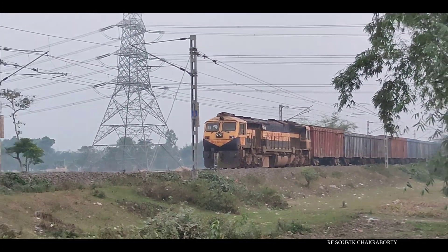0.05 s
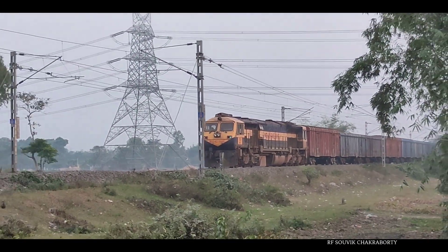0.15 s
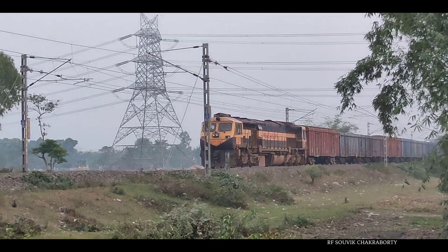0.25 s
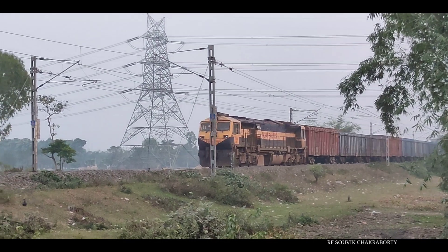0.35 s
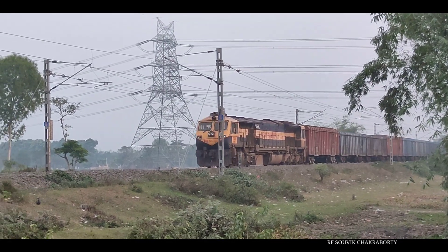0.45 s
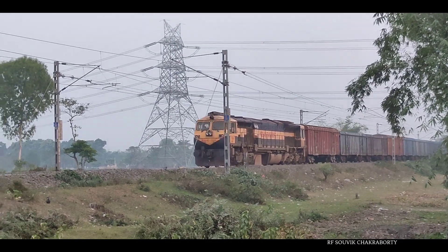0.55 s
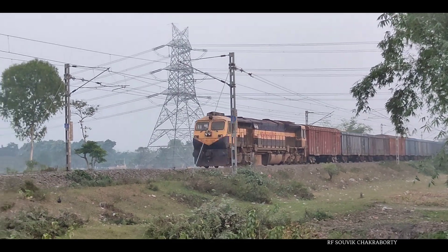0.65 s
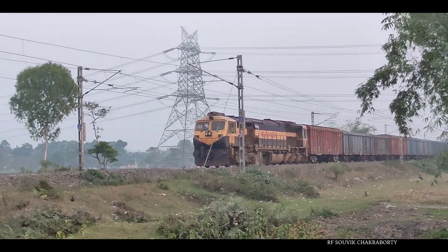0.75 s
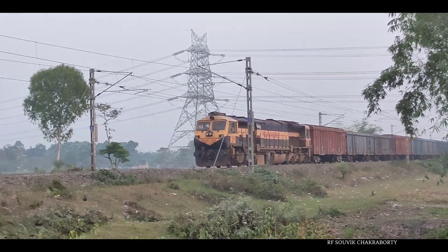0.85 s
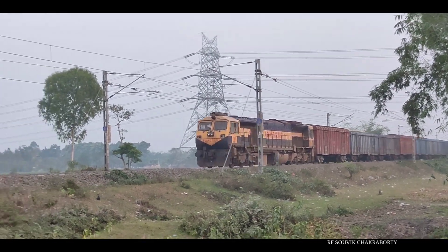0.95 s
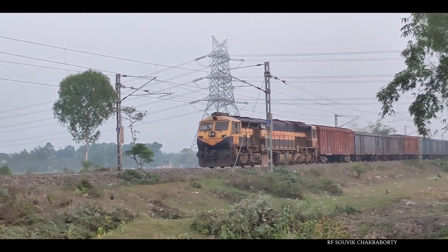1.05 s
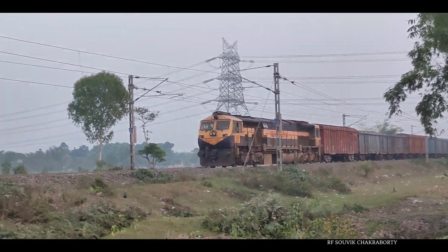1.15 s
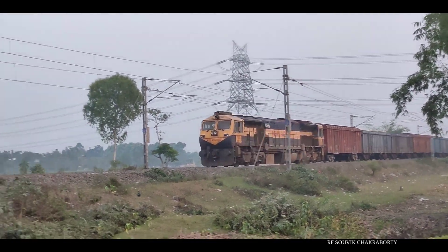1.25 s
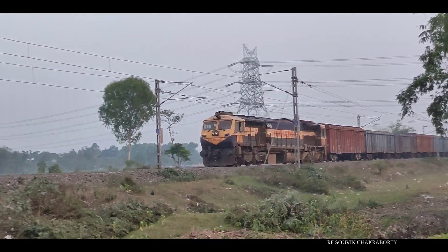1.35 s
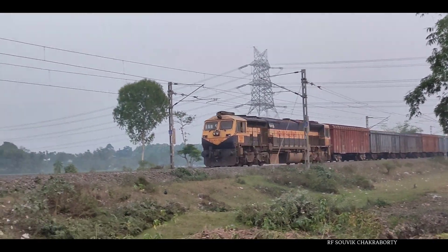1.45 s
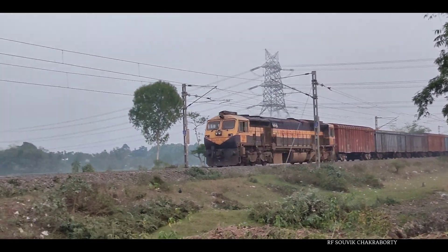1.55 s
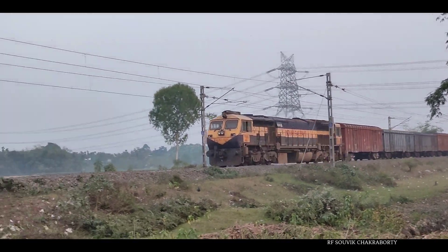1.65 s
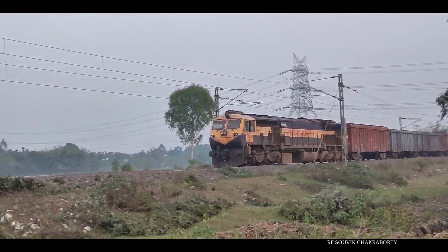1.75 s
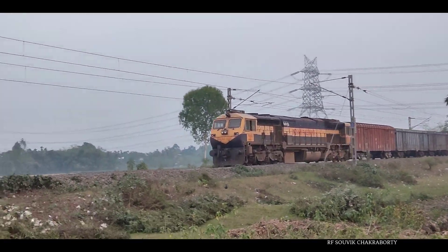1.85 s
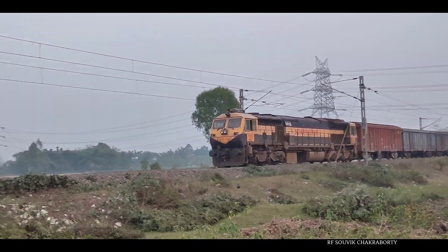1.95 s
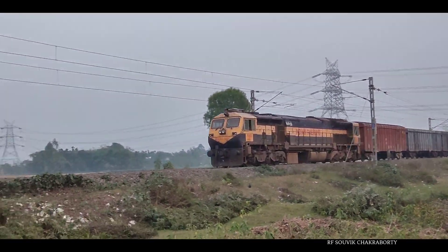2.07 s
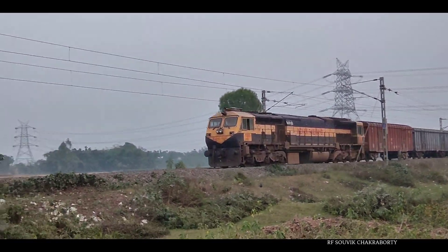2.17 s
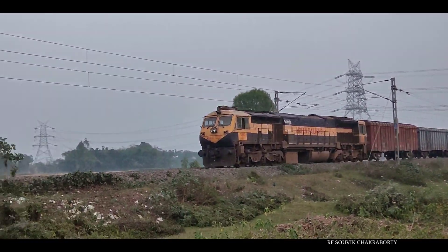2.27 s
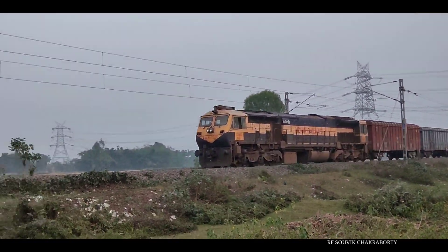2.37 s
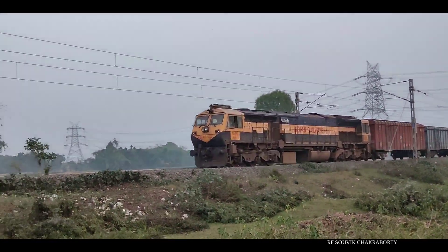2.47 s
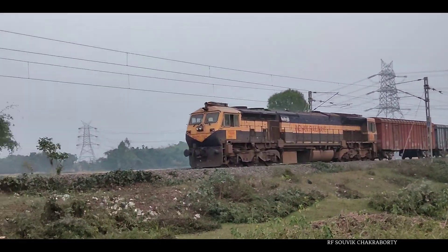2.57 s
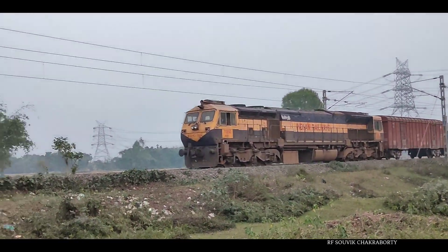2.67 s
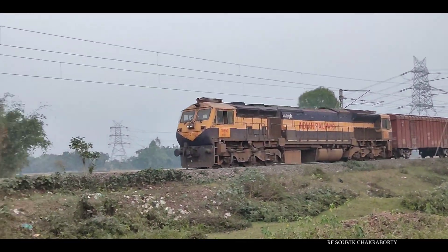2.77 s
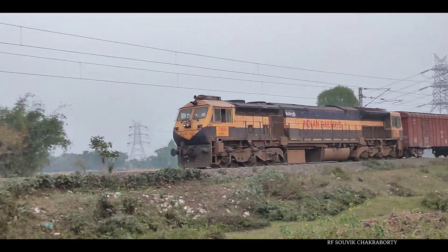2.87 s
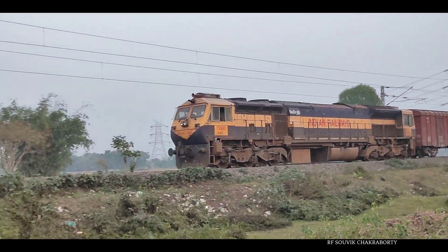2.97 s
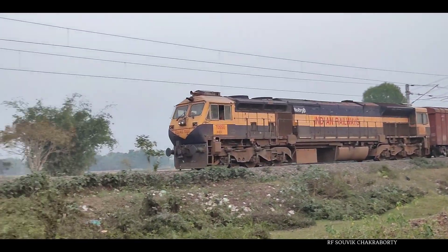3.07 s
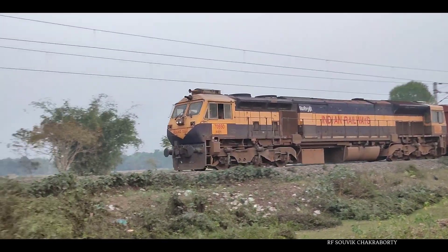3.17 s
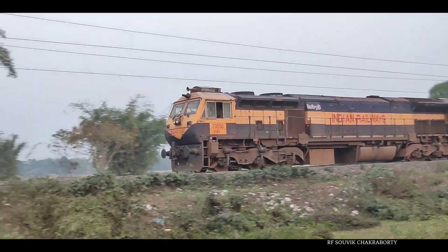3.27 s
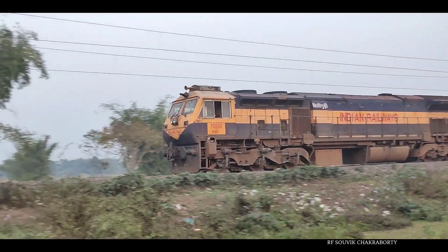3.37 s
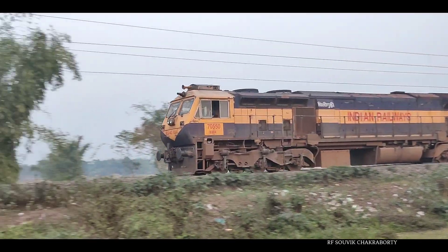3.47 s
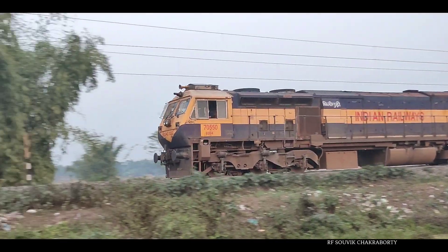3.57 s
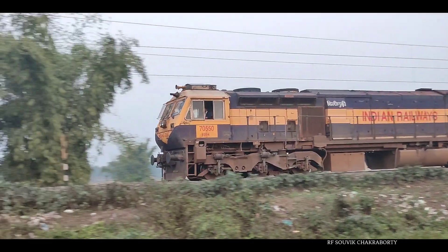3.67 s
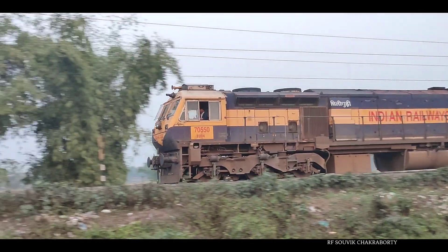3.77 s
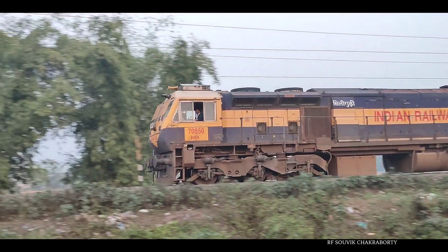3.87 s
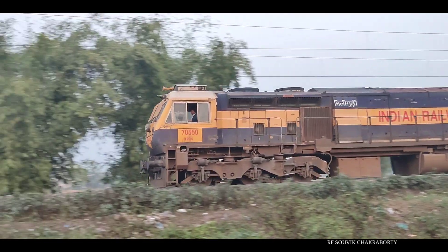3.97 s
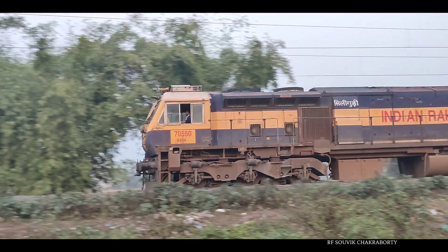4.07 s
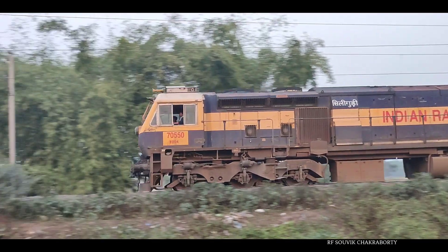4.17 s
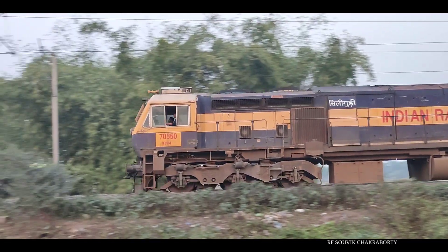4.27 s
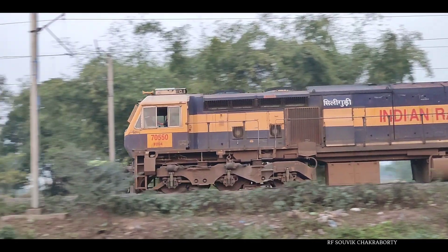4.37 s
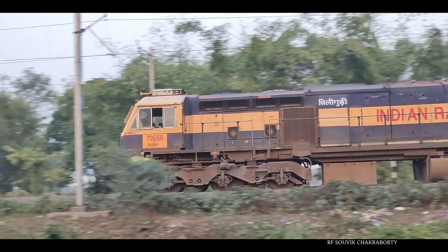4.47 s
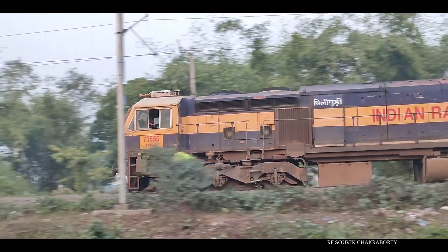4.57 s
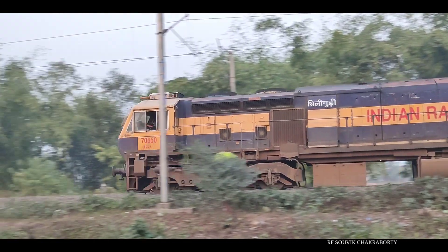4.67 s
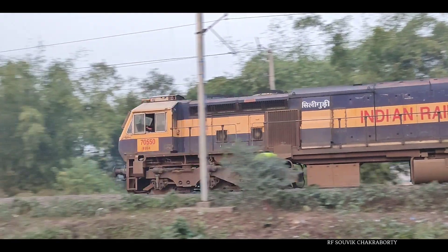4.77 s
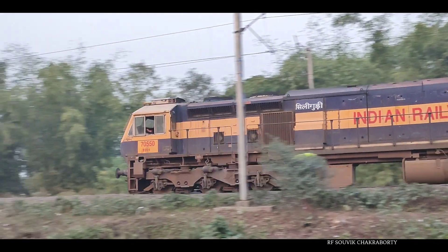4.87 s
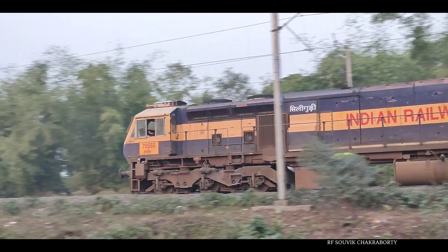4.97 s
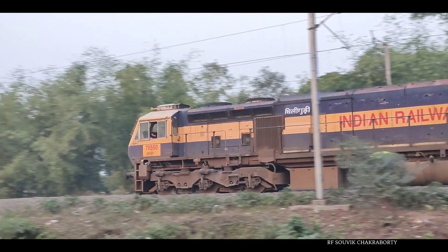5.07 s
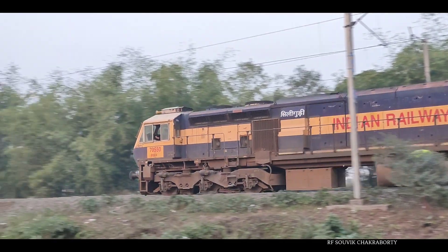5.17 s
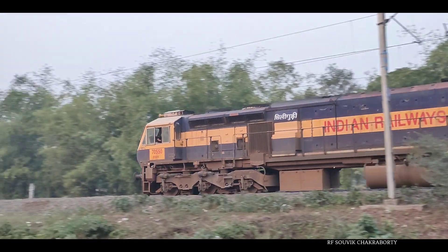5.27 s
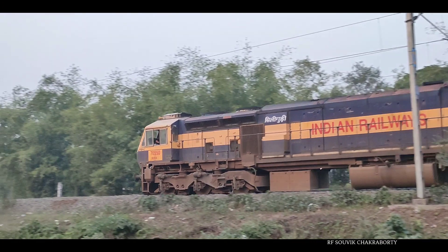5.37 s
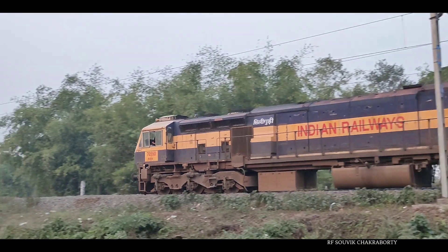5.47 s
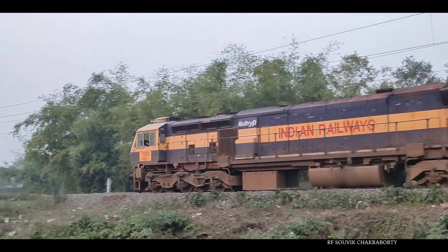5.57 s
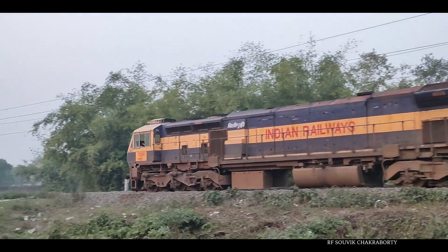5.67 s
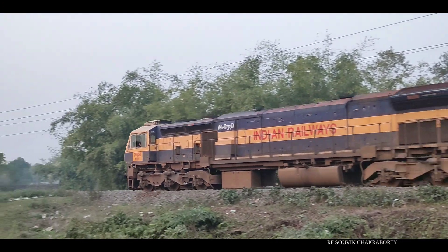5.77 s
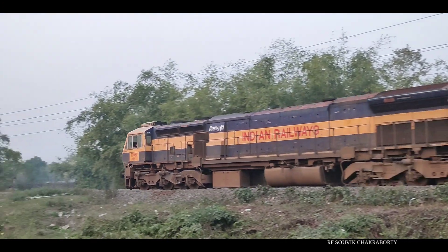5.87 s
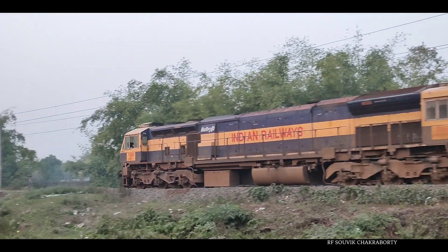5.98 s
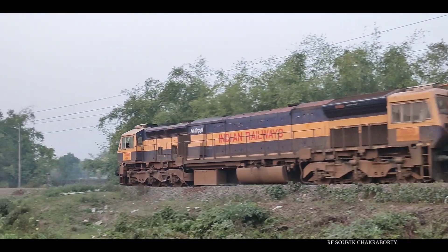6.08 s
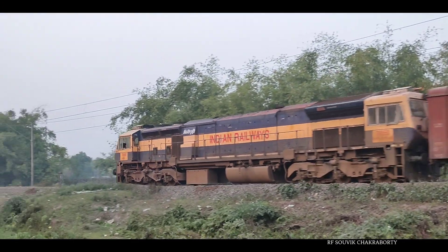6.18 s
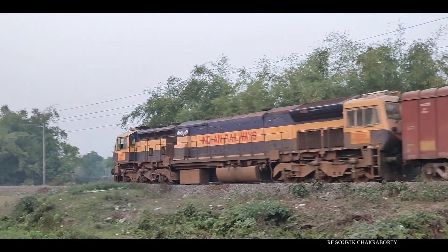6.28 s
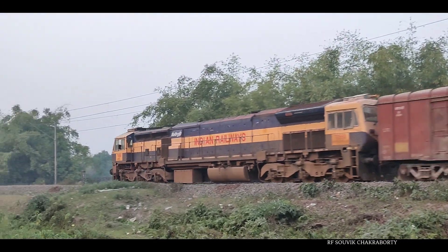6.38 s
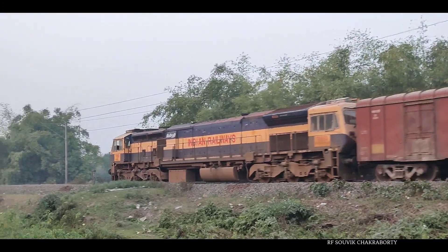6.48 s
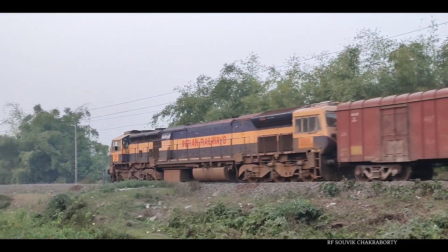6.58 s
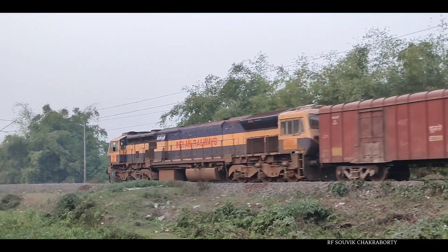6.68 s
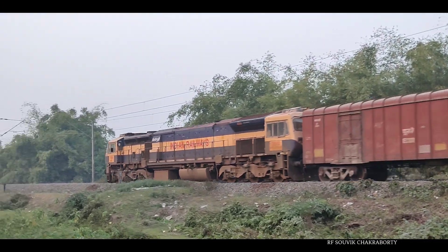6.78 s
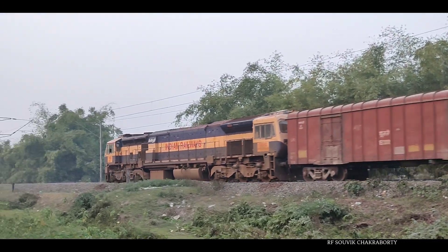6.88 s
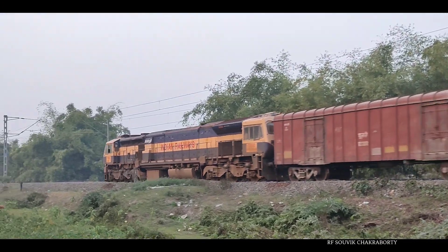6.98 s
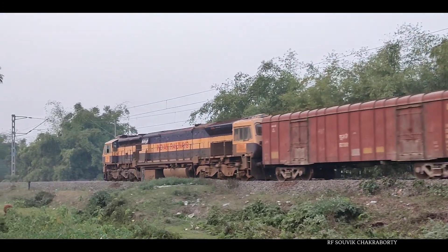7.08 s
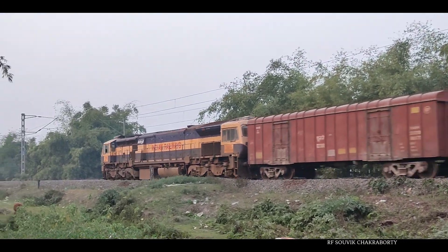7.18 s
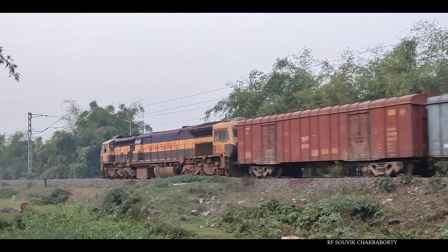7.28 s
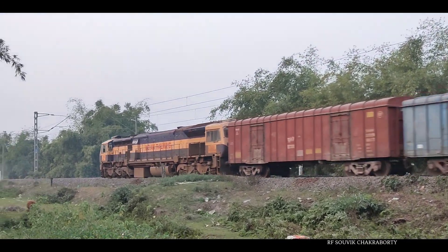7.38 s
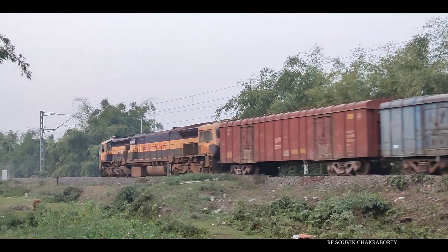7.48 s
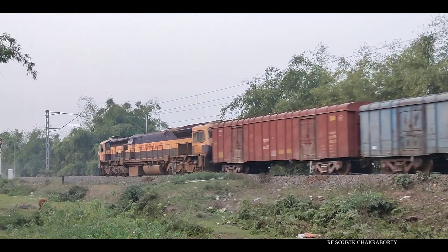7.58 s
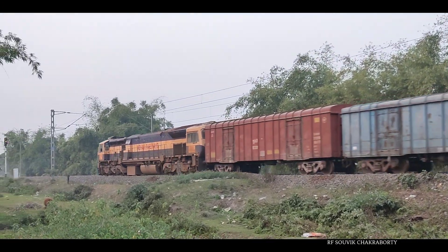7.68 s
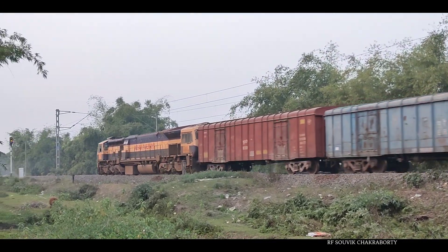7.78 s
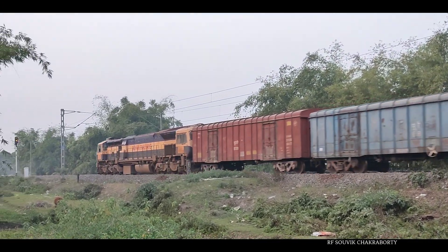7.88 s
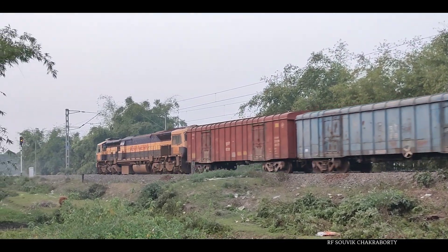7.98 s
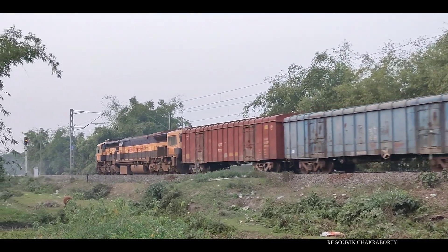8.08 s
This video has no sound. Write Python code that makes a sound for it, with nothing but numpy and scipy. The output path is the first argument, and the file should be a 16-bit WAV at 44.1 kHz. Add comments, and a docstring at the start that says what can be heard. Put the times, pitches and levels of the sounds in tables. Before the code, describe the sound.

Outdoors beside an embankment, a heavy diesel locomotive approaches, its rapid low throb climbing in pitch and strength. A bird whistles once early on. As the engine draws level, puffing exhaust, fan hum and thin turbo whine mix with swelling wheel roar and bright hiss. It then recedes with the engine easing slightly, while freight wagons keep rolling past with light squeals. Stereo microphone in a field, fairly close to the track.

```python
"""An exhaust throbs once a turn, rising as a two-stroke diesel locomotive is notched up, then easing down a little.
It hauls freight wagons along an embankment, past a listener in a field: crank-locked notes over puffing noise.
Its fan and gear-driven turbocharger whine at multiples of the crank speed; a traction gear drops in pitch as it passes.
Coloured noise makes the wheels roar and hiss on the rails, narrow wavering tones make them squeal.
A bird, one gliding sine, whistles once while the train is still far."""
import sys
import numpy as np
from scipy import signal
from scipy.fft import rfft, irfft
from scipy.io import wavfile
from scipy.ndimage import map_coordinates

SR = 44100
rng = np.random.default_rng(int(sys.argv[2]) if len(sys.argv) > 2 else 0)


def wav_record(signal):
    """Record a signal, one row per channel, as 16-bit PCM in the file named by sys.argv[1]."""
    frames = np.transpose(np.atleast_2d(signal))
    bounded = np.clip(frames, -1, 1)
    # unit amplitude maps onto the largest positive 16-bit level
    quanta = np.round(bounded * 32767).astype(np.int16)
    wavfile.write(sys.argv[1], SR, quanta)


N = 358753
TIME = np.arange(N) / SR
FREQS = np.maximum(np.arange(N // 2 + 1) * SR / N, 1)
# the pass: speed, closest distance of the track, moment abreast of the listener
TRAIN_M_PER_S, TRACK_M, ABREAST_S = 16.48, 16.97, 4.55


def from_db(db):
    """Decibels to gain."""
    return 10 ** (np.asarray(db) / 20)


def rms_one(x):
    """Scale to unit power."""
    return x / np.sqrt(np.mean(x ** 2) + 1e-20)


def in_time(rows):
    """Each column of a curve, joined by straight lines."""
    s, *columns = np.transpose(rows)
    return [np.interp(TIME, s, c) for c in columns]


def over_hz(points):
    """A table joined by straight lines on a log-frequency axis."""
    hz, value = np.transpose(points)
    return np.interp(np.log(FREQS), np.log(hz), value)


def colour(noise_spectrum, spectrum):
    """Give noise a spectrum that falls away steeply beyond its ends; rms 1."""
    low_skirt = np.minimum(1, FREQS / spectrum[0][0])
    high_skirt = np.minimum(1, spectrum[-1][0] / FREQS)
    gain = from_db(over_hz(spectrum)) * (low_skirt * high_skirt) ** 2
    return rms_one(irfft(noise_spectrum * gain, N))


def drift(rate):
    """Smooth chance that changes about rate times a second; spread 1."""
    knots = rng.standard_normal(int(2 * rate * N / SR) + 4)
    # drawn at every 16th sample, then held
    coarse = map_coordinates(knots, [2 * rate * TIME[::16]], order=2, mode="nearest")
    return rms_one(coarse).repeat(16)[:N]


# how alike left and right are: (f/Hz, likeness 0 to 1)
LIKENESS = [(60, 1), (120, 0.98), (250, 0.94), (500, 0.77), (1000, 0.56), (2000, 0.22), (4000, 0.19),
            (8000, 0.59)]


def stereo_noise():
    """The spectrum of white noise on two sides, alike in the bass and less so in most of the treble."""
    alike = np.clip(over_hz(LIKENESS), 0, 1)
    mid, side = rng.standard_normal((2, len(FREQS))) + 1j * rng.standard_normal((2, len(FREQS)))
    return np.sqrt(1 + alike) * mid + np.sqrt(1 - alike) * side * [[1], [-1]]


def unsteady_tone(cycles, width_hz):
    """A tone scattered by turbulence into a narrow band; rms 1."""
    in_phase = drift(width_hz) * np.cos(2 * np.pi * cycles)
    quadrature = drift(width_hz) * np.sin(2 * np.pi * cycles)
    return rms_one(in_phase + quadrature)


def swell(at, width):
    """A bell-shaped rise and fall; width is its standard deviation in seconds."""
    return np.exp(-((TIME - at) / width) ** 2 / 2)


def surges(rows):
    """The dB that a few short swells add to a level."""
    return sum(added_db * swell(at, width) for at, width, added_db in rows)


def passing(level_db, loudest_s, coming_db, going_db):
    """Level in dB of a source carried along the track: it falls with each doubling of its distance."""
    along = TRAIN_M_PER_S * (loudest_s - TIME)
    doublings = np.log2(np.hypot(along, TRACK_M) / TRACK_M)
    return level_db - doublings * np.where(along > 0, coming_db, going_db)


def heading():
    """Cosine of the angle between the track and the line to the listener: 1 coming, 0 abreast, -1 going."""
    along = TRAIN_M_PER_S * (ABREAST_S - TIME)
    return along / np.hypot(along, TRACK_M)


# crankshaft speed as heard: (t/s, turns per s)
CRANK = [(0.0, 8.034), (0.5, 8.255), (1.0, 8.348), (1.5, 8.709), (2.0, 9.154), (2.5, 9.463), (3.0, 9.718),
         (3.5, 9.902), (4.0, 9.917), (4.5, 9.798), (5.0, 9.657), (5.5, 9.476), (6.0, 9.354), (6.5, 9.27),
         (7.0, 9.269), (7.5, 9.217), (8.13, 9.188)]


def crank_speed():
    """Turns per second as the engine is notched up and eases down."""
    return in_time(CRANK)[0]


def crank_angle(turns):
    """Radians since the weak cylinder first fired, at 0.0418 s."""
    return 2 * np.pi * (turns - np.interp(.0418, TIME, turns))


def load_db(db_per_turn=5, cruise_turns_per_s=9.35):
    """Extra exhaust level from the engine's effort, counted from the cruising speed."""
    return db_per_turn * (crank_speed() - cruise_turns_per_s)


# a bird's whistle: (t/s, f/Hz, level/dB midway between the sides)
BIRD = [(.77, 5100, -69), (.78, 5300, -57), (.795, 5780, -55), (.82, 6080, -55), (.855, 6240, -63),
        (.88, 6150, -68), (.92, 5650, -62), (.96, 5300, -78)]


def bird(pan_db=4.0):
    """One arching whistle on the left, a sine whose pitch and level glide."""
    hz, level_db = in_time(BIRD)
    singing = (TIME > BIRD[0][0]) & (TIME < BIRD[-1][0])
    whistle = singing * np.sin(2 * np.pi * np.cumsum(hz) / SR)
    return whistle * from_db(level_db + np.array([[1], [-1]]) * pan_db)


# a moment of duller hiss while the train is far: (t/s, bell width/s, added level/dB)
TREBLE_DIP = [(1.35, 0.46, -3.5)]


def dulled(hiss, treble_hz=5270):
    """Turn down the top of the hiss during its dip."""
    treble = irfft(rfft(hiss) * (FREQS > treble_hz), N)
    return hiss + treble * (from_db(surges(TREBLE_DIP)) - 1)


# wheel noise spectra, far and near roar, left and right hiss: (f/Hz, relative level/dB per Hz)
ROLLING_FAR = [(250, -16.5), (360, -7), (500, 0.5), (640, 0), (760, 0.5), (860, -8), (1130, -3), (1420, -9),
               (1780, -7), (2150, -17.5), (2600, -17.5), (4000, -28)]
ROLLING_NEAR = [(250, -11), (360, -4.5), (500, -1.5), (640, 1.5), (760, 0), (860, -7.5), (1130, -4),
                (1420, -8), (1780, -7), (2150, -11.5), (2600, -16), (4000, -30.5)]
HISS_LEFT = [(1200, -19.5), (2400, -11), (3000, -5.5), (3600, -4), (4300, 0), (4750, -1.5), (5500, -1),
             (6200, -5), (6800, -7.5), (7550, -11), (7900, -40.5)]
HISS_RIGHT = [(1200, -23), (2400, -13), (3000, -6.5), (3600, -2), (4300, -4.5), (4900, -6), (5500, -4.5),
              (6200, -1), (6800, 4.5), (7450, 4.5), (7800, -5.5), (8000, -35.5)]
# roar and hiss going by: (level/dB before trims, loudest t/s, dB lost per doubling coming, same going)
ROLLING_PASS = (-40, 4.5, 8, 1.65)
HISS_PASS = (-37, 5, 8, 3)
# the hiss sets in: (t/s, level/dB re full)
HISS_ONSET = [(.25, -4.5), (.45, 0)]
# brief surges of wheel noise, in full on the hiss: (t/s, bell width/s, added level/dB)
WHEEL_SURGES = [(.52, 0.14, 3.5), (2.45, 0.57, 3), (3.89, 0.02, 1.5), (5.92, 0.07, 2.5), (6.24, .07, 2),
                (7.54, .03, 1.5)]


def wheels(rolling_db=3.0, left_db=5.0, right_db=2.5, rough_db=0.92, flicker_db=0.72, surge_share=0.43):
    """Rough treads make the rails roar; sliding contact hisses, with a different colour on each side."""
    surge_db = surges(WHEEL_SURGES)
    roll_db = passing(*ROLLING_PASS) + surge_share * surge_db + rolling_db + rough_db * drift(15)
    near = np.interp(TIME, [2.3, 4.0], [0, 1])  # from afar the ground reflection cuts deeper notches
    far_roar = np.sqrt(1 - near) * colour(stereo_noise(), ROLLING_FAR)
    near_roar = np.sqrt(near) * colour(stereo_noise(), ROLLING_NEAR)

    hiss_db = passing(*HISS_PASS) + in_time(HISS_ONSET)[0] + surge_db
    hiss_db = hiss_db + flicker_db * (drift(9) + drift(40))
    left, right = stereo_noise()
    left_hiss = from_db(left_db) * colour(left, HISS_LEFT)
    right_hiss = from_db(right_db) * colour(right, HISS_RIGHT)
    hiss = dulled(np.array([left_hiss, right_hiss]))
    return (far_roar + near_roar) * from_db(roll_db) + hiss * from_db(hiss_db)


# wheel squeals and ringing: (t/s, bell width/s, f/Hz, bandwidth/Hz, level/dB)
SQUEALS = [(.5, 0.47, 635, 42, -58), (1.793, 1.4, 3573, 140, -61), (2.51, .4, 733, 40, -46),
           (3.304, 0.27, 1114, 51, -50.5), (4.1, 0.089, 3480, 50, -51), (5.65, 0.062, 279, 14, -37.5),
           (5.805, .3, 5050, 150, -44.5), (6.362, 0.032, 6620, 25, -56), (6.707, 1.0, 4355, 160, -51.5),
           (6.895, 0.29, 684.6, 59, -46.5), (7.384, 0.1, 1282, 72, -47.5), (7.954, 0.12, 5100, 90, -45)]


def squeals():
    """Rubbing and jolting on the rail set a wheel or a body panel singing for a while."""
    out = 0
    for at, width, hz, width_hz, level_db in SQUEALS:
        out = out + from_db(level_db) * swell(at, width) * unsteady_tone(hz * TIME, width_hz)
    return out


# gear tone going by: (level/dB, loudest t/s, dB lost per doubling coming, same going)
GEAR_PASS = (-45.5, 5, 7, 12.5)
# it swells, then dips, on the approach: (t/s, bell width/s, added level/dB)
GEAR_SWELLS = [(2.75, 0.23, 7.5), (3.2, .11, -7)]


def traction_gear(mesh_hz=979.6, sound_m_per_s=343, waver_rad=0.66, flutter_db=2.5):
    """A steady mesh tone, Doppler-shifted by the pass."""
    hz = mesh_hz / (1 - TRAIN_M_PER_S * heading() / sound_m_per_s)
    level_db = passing(*GEAR_PASS) + surges(GEAR_SWELLS) + flutter_db * drift(14)
    phase = 2 * np.pi * np.cumsum(hz) / SR + waver_rad * drift(19)
    return np.sqrt(2) * from_db(level_db) * np.sin(phase)


# breathy turbocharger whines:
# (multiple of crank speed, bandwidth/Hz, level/dB midway, loudest t/s, bell width/s, left-right level/dB)
WHINES = [(471, 160, -58, 2.1, 1, 12.5), (569, 190, -43, 6.0, 0.73, 7.5), (583, 150, -63, 4.3, 0.94, 11),
          (880, 120, -49, 1.08, 0.13, -15.5), (863.5, 160, -51, 1.3, 0.36, -11),
          (880, 92, -52.5, 0.49, 0.31, -18.5), (866, 240, -56.5, 0.77, 0.54, -11)]


def whines(turns, flutter_db=1.4):
    """Turbocharger whines are beamed at the listener for a while and scatter differently to each side."""
    out = 0
    for multiple, width_hz, level_db, at, width, pan_db in WHINES:
        tone = np.array([unsteady_tone(multiple * turns, width_hz) for side in range(2)])
        side_db = level_db + flutter_db * drift(7) + np.array([[.5], [-.5]]) * pan_db
        out = out + tone * swell(at, width) * from_db(side_db)
    return out


# clear turbocharger notes, lower and upper: (level/dB, loudest t/s, bell width/s)
TURBO = [(-58.5, 1.7, 1), (-49.5, 4.45, 0.83)]
# their multiples of the crank speed: (t/s, lower, upper)
TURBO_ORDERS = [(3.9, 486, 568), (5.1, 486, 564)]


def turbocharger(turns, waver_rad=.7, side_waver_rad=.5, flutter_db=2.5):
    """Thin notes follow the crank; hot rising air makes phase and level shimmer, the phase apart on each side."""
    out = 0
    for multiple, (level_db, at, width) in zip(in_time(TURBO_ORDERS), TURBO):
        phase = 2 * np.pi * np.cumsum(multiple * np.gradient(turns)) + waver_rad * drift(25)
        tone = np.array([np.sin(phase + side_waver_rad * drift(20)) for side in range(2)])
        out = out + np.sqrt(2) * tone * swell(at, width) * from_db(level_db + flutter_db * drift(14))
    return out


# fan tones geared to the crank: (multiple of crank speed, level/dB, loudest t/s, bell width/s)
FAN = [(31.56, -54.5, 3.1, 1.05), (47.4, -40, 3.73, 0.41), (47.9, -48, 5.3, 0.7), (46.5, -55.5, 2.17, 0.49),
       (47.7, -49.5, 7.8, 0.71), (52.1, -54.5, 4.7, 1.8), (79.6, -49, 4.6, 0.68), (79, -52, 7.3, 1.1)]


def fan(turns, waver_rad=0.46, flutter_db=1.5):
    """Blade tones follow the crank; they swell and fade as the ground reflection shifts."""
    out = 0
    for multiple, level_db, at, width in FAN:
        tone = np.sqrt(2) * np.sin(2 * np.pi * multiple * turns + waver_rad * drift(5))
        out = out + tone * swell(at, width) * from_db(level_db + flutter_db * drift(6))
    return out


# exhaust noise spectra: (f/Hz, relative level/dB per Hz)
RUMBLE = [(12, -23.5), (22, -8), (33, -9.5), (45, 1), (68, -8), (88, -6), (112, -11.5), (150, -22.5)]
ROAR = [(70, -20.5), (125, 4.5), (170, 0.5), (205, 4), (250, 0), (275, 2.5), (340, -10.5), (480, -27),
        (800, -36.5)]
# each going by, before throb, puffs and load: (level/dB, loudest t/s, dB lost per doubling coming, same going)
RUMBLE_PASS = (-32.5, 6, 5, 2.6)
ROAR_PASS = (-38, 5, 10, 0.15)


def rumble_and_roar(turns, puff=0.57, throb=0.46):
    """Exhaust gas leaves the stack in turbulent puffs; its low rumble sags at the weak cylinder."""
    angle = crank_angle(turns)
    sag = 1 - throb * np.cos(angle)
    rumble = from_db(passing(*RUMBLE_PASS)) * sag * colour(stereo_noise(), RUMBLE)
    puffs = 1 + puff * np.cos(8 * angle)
    roar = from_db(passing(*ROAR_PASS) + load_db()) * puffs * colour(stereo_noise(), ROAR)
    return rumble + roar


# exhaust notes beside the firing note, balanced among themselves:
# (multiple of crank speed, relative level/dB from ahead, relative level/dB from the side)
ORDERS = [(5, -51, -38.5), (6, -53.5, -49), (7, -41, -34.5), (9, -41.5, -32.5), (10, -55, -45),
          (11, -42.5, -35.5), (13, -39.5, -71.5), (14, -77, -41.5), (15, -52, -60), (16, -66, -42),
          (17, -59.5, -45.5), (18, -64, -40.5)]
# firing note (before load and swells) and side notes going by:
# (level/dB, loudest t/s, dB lost per doubling coming, same going)
FIRING_PASS = (-26.5, 6, 2.15, 4.5)
SIDE_NOTES_PASS = (-30.5, 5, 5.5, 5)
# the firing note swells once and fades twice: (t/s, bell width/s, added level/dB)
FIRING_SWELLS = [(1.38, 0.17, 3), (4.24, .14, -11), (5.15, 0.31, -3.5)]


def exhaust(turns, uneven_db=4.0, upper_lag_rad=2.6, smear_rad=.45):
    """Eight beats a turn; one is weak, so the neighbouring crank orders oppose the firing note at that angle."""
    firing_db = passing(*FIRING_PASS) + load_db() + surges(FIRING_SWELLS)
    side_db = passing(*SIDE_NOTES_PASS)
    angle = crank_angle(turns)
    side_on = np.interp(TIME, [1.6, 4.1, 6.0, 8.1], [0, 0.98, 0.97, 0.46])  # 0 from ahead, 1 from the side
    sides, power = 0, 0
    for order, ahead_db, abreast_db in ORDERS:
        gain = from_db(ahead_db + (abreast_db - ahead_db) * side_on)
        above = max(order - 12, 0)
        # the silencer delays the upper notes and smears them over the turn
        delay = (above > 0) * order * upper_lag_rad + smear_rad * above ** 2
        sides = sides + gain * from_db(uneven_db * drift(3)) * np.cos(order * angle - delay)
        power = power + gain ** 2
    firing = from_db(firing_db) * np.cos(8 * angle)
    return np.sqrt(2) * (firing - from_db(side_db) * sides / np.sqrt(power))


def scene(lead_samples=3.3):
    """The train and the bird; the side that the train's sound reaches first changes as it goes by."""
    turns = np.cumsum(crank_speed()) / SR
    locomotive = exhaust(turns) + rumble_and_roar(turns) + fan(turns) + whines(turns) + traction_gear()
    left, right = locomotive + wheels() + squeals()
    # positive lag: the left side hears it first
    lag = lead_samples * np.interp(TIME, [0, 3.5, 5.2, 6.5, 8.1], [-0.3, 0.77, 1.49, -0.034, -0.77])
    right = map_coordinates(right, [np.arange(N) - lag], order=3, mode="nearest")
    train = np.array([left, right]) * from_db([[.2], [-.2]])
    return train + turbocharger(turns) + bird()


def record(dry, cutoff_hz=8100):
    """The top is cut steeply by an elliptic low-pass."""
    low_pass = signal.ellip(12, .1, 90, cutoff_hz, fs=SR, output="sos")
    return signal.sosfilt(low_pass, dry)


dry = scene()
out = record(dry)
wav_record(out)
```